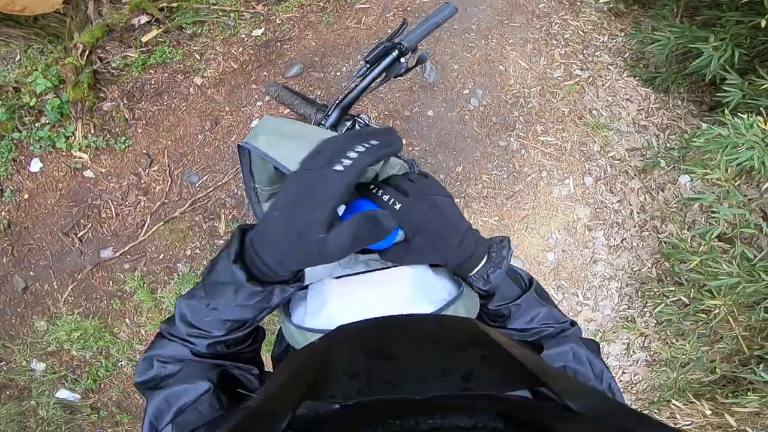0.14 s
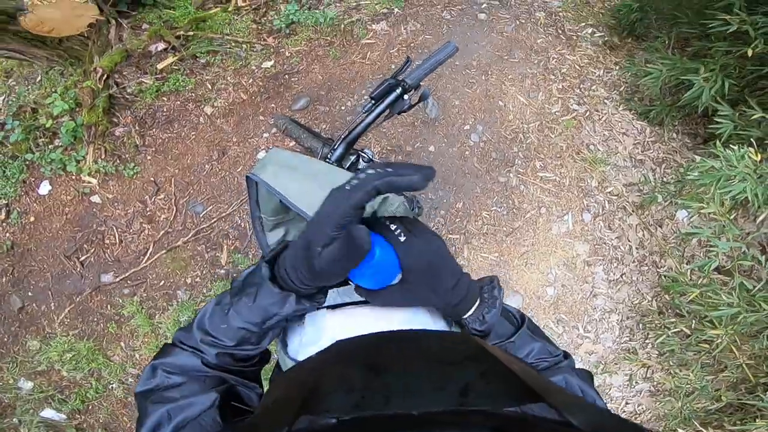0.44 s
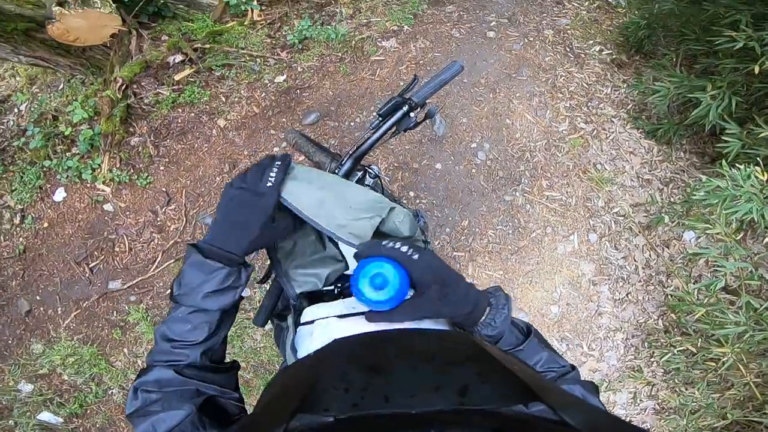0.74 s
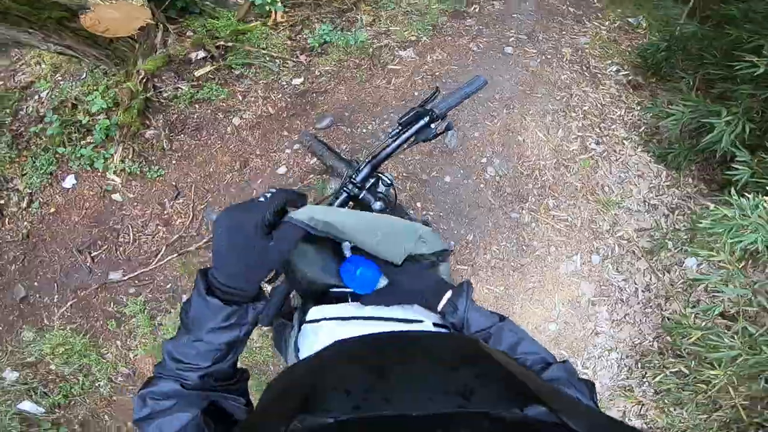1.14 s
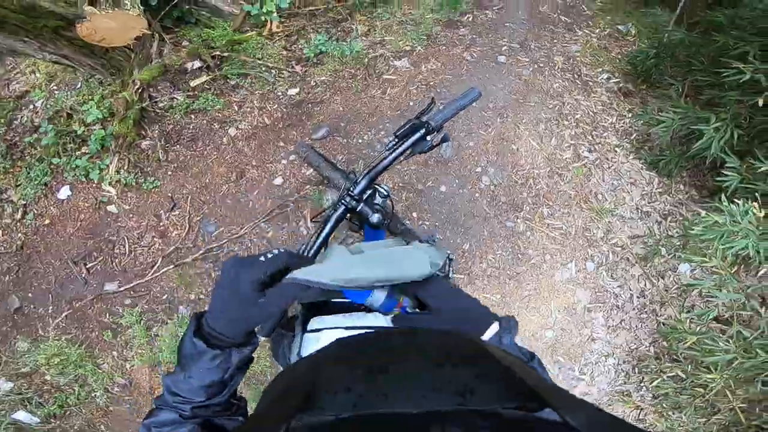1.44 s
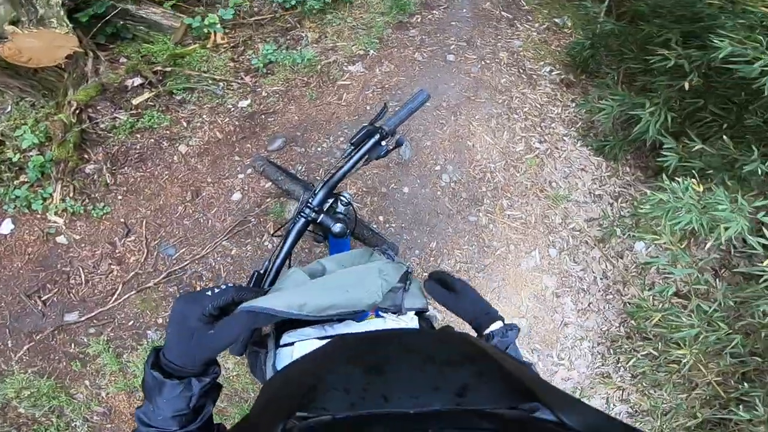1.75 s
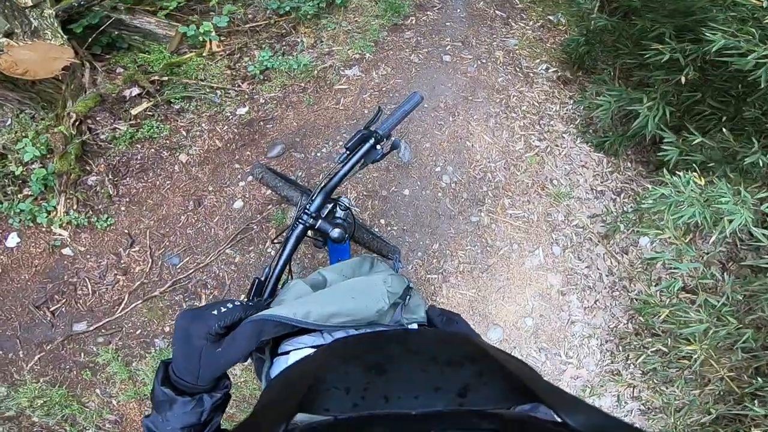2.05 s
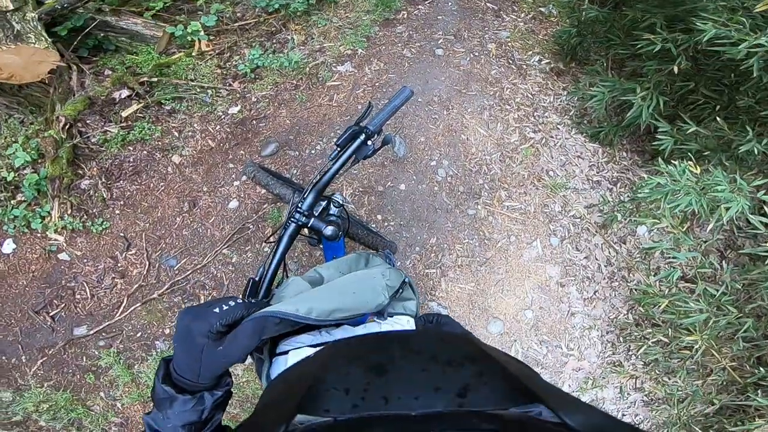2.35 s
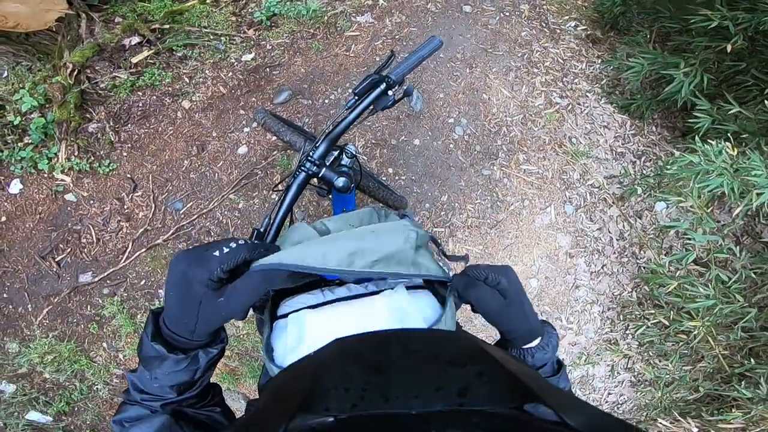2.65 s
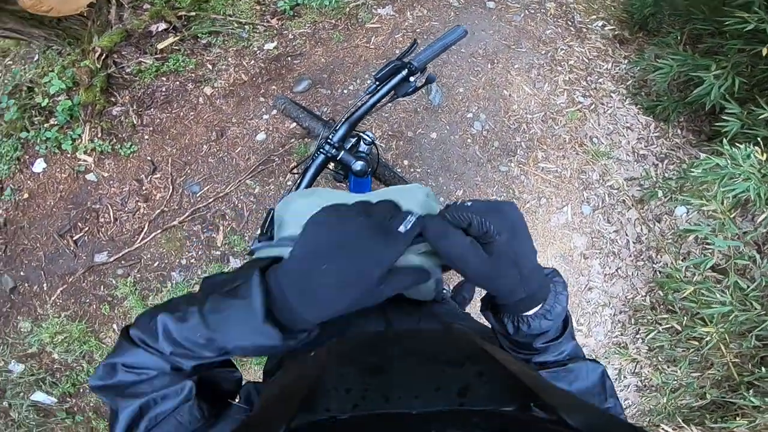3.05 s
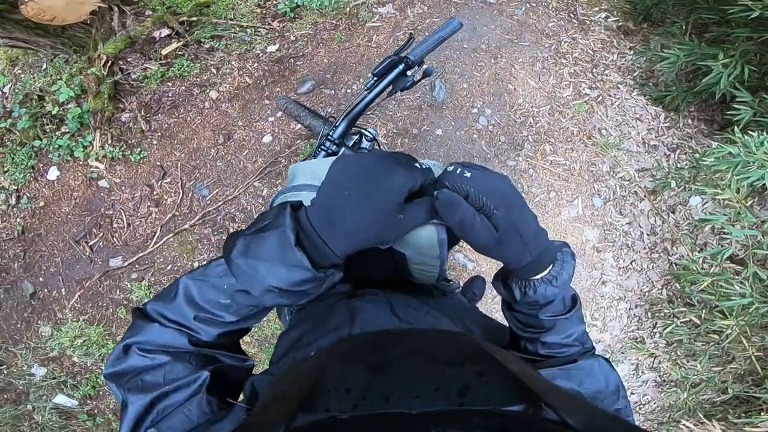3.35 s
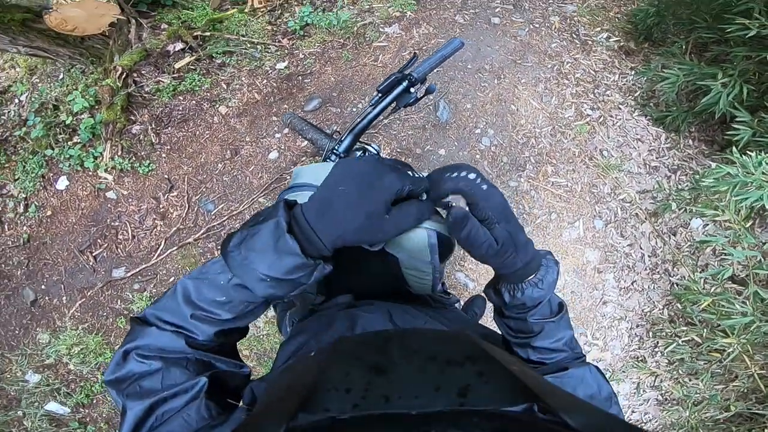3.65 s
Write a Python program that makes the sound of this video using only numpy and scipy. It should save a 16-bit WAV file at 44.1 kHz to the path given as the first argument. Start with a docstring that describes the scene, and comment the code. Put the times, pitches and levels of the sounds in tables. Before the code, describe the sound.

A waist bag zipper closes in one fast rising-then-falling zip, after nylon sleeves rustle and a bottle scrapes into the bag; dull knocks follow, with faint birds, on a quiet forest path, microphone worn on the chest.

```python
"""A quiet forest hiss and rustling nylon sleeves come first, both made of shaped noise, over low bumps.
A rider with a chest camera packs a bottle into a waist bag on a forest path and zips it shut.
Bumps (deep swings) and knocks (dying tones) reach the right microphone through the harness; small clicks
tick. The bottle scrapes in as grainy noise; after a short high squeak, far birds whistle, all as wavering
tones. The zip sounds tooth by tooth: a click, a hum at the tooth rate and a pulsing hiss."""
import sys
import numpy as np
from scipy import signal
from scipy.fft import rfft, irfft, next_fast_len
from scipy.io import wavfile
from scipy.ndimage import map_coordinates

SR = 44100
rng = np.random.default_rng(int(sys.argv[2]) if len(sys.argv) > 2 else 0)


def volts_from_db(level):
    """Convert decibel levels to linear amplitude ratios."""
    exponent = np.asarray(level, float) / 20
    return 10 ** exponent


def log_audio(samples):
    """Write samples as a 16-bit WAV file to the path given in sys.argv[1]."""
    # one column per channel
    frames = np.atleast_2d(samples).T
    # limit to full scale, then quantise
    limited = np.clip(frames, -1, 1)
    pcm = np.round(limited * 32767).astype(np.int16)
    wavfile.write(sys.argv[1], SR, pcm)


N = 167580
T = np.arange(N) / SR  # time of each sample, s

# How hard the sleeves move: start_s, swish_db, crinkle_db (the sleeves add 2.5 dB to the crinkle)
CLOTH_MOVES = [(0, -64.5, -65), (.1, -63.5, -68), (.18, -78, -81), (.26, -73.5, -67.5), (.33, -69, -62),
               (.65, -69.5, -70.5), (.76, -74, -66.5), (1.15, -68.5, -70), (1.28, -72, -69.5),
               (1.39, -60, -63), (1.53, -65, -61.5), (1.65, -72.5, -70), (1.8, -81, -80.5),
               (1.92, -67.5, -66.5), (2.1, -70, -71), (2.25, -74, -74.5), (2.4, -76, -71.5),
               (2.52, -75, -66.5), (2.92, -74, -64.5), (3.02, -67.5, -69), (3.17, -62, -56),
               (3.28, -70.5, -69), (3.5, -71.5, -67), (3.7, -75, -72.5), (3.8, -67.5, -77.5)]


def unit(x):
    """Scale a sound to an rms of 1."""
    return x / np.sqrt(np.mean(x ** 2) + 1e-20)


def along(points, hz):
    """Read a curve of (pitch_hz, value) points on a log pitch axis."""
    point_hz, value = np.transpose(points)
    return np.interp(np.log(hz + 1), np.log(point_hz + 1), value)


def curves(rows):
    """Draw each column after the time as a line with one value per sample."""
    s, *columns = np.transpose(rows)
    return [np.interp(T, s, column) for column in columns]


def wobble(rate_hz):
    """A smooth random curve through rate_hz random points a second."""
    points = rng.standard_normal(int(N * rate_hz / SR) + 4)
    return map_coordinates(points, [T * rate_hz])


def filtered(x, response):
    """Multiply the spectrum of x by a response, a function of pitch in Hz."""
    size = next_fast_len(N + 8192)
    hz = np.fft.rfftfreq(size, 1 / SR)
    return irfft(rfft(x, size) * response(hz), size)[..., :N]


def ports(x, other):
    """Airborne sound reaches both microphone ports; other is the part that differs between them."""
    # left port over right: pitch_hz, level_db
    left_over_right = [(100, 0.5), (400, -2.5), (700, -3.5), (1300, -0.5), (2400, 0), (4400, -3.5),
                       (8000, 0.5), (15000, -2)]
    # how far the left port leads in phase: pitch_hz, lead_rad
    left_lead = [(100, 1.2), (400, 0.8), (750, 2.13), (1300, 1.5), (2500, 0.88), (4000, 0.46), (7500, 0.36),
                 (12000, 9)]
    # how alike the ports sound: pitch_hz, likeness (0 to 1)
    likeness = [(200, 0.52), (700, 1), (3000, 0.78), (6000, 0.38), (9000, 0.07)]
    opposite = np.array([[1], [-1]])  # left, right

    def mix_angle(hz):
        return np.arccos(np.clip(along(likeness, hz), 0, 1)) / 2

    def tilt(hz):
        log_level = along(left_over_right, hz) * np.log(10) / 20
        return np.exp(opposite * (log_level + 1j * along(left_lead, hz)) / 2)

    shared = filtered(x, lambda hz: np.cos(mix_angle(hz)) * tilt(hz))
    different = filtered(other, lambda hz: opposite * np.sin(mix_angle(hz)) * tilt(hz))
    return shared + different


def rustle(spectrum, grains_hz, spread_db, flutter_db):
    """Two rows of noise with random short grains and a fluttering level, coloured, rms 1."""
    grain_size = volts_from_db(spread_db * np.minimum(rng.exponential(size=N), 4))
    grains = (rng.random(N) < grains_hz / SR) * grain_size
    fade = np.exp(-1 / (0.00062 * SR))  # each grain dies away over about 0.6 ms
    burst = 1 + signal.lfilter([1], [1, -fade], grains)
    flutter = volts_from_db(flutter_db * (wobble(12) + wobble(45)))
    noise = rng.standard_normal((2, N)) * burst * flutter
    return unit(filtered(noise, lambda hz: volts_from_db(along(spectrum, hz))))


def inside(start_s, end_s, fade_s):
    """1 between two times, fading to 0 at both ends."""
    return np.clip(np.minimum(T - start_s, end_s - T) / fade_s, 0, 1)


def resonances(rows):
    """Response of resonances side by side (pitch_hz, width_hz, level_db), every second one flipped."""
    def response(f):
        total = 0
        for j, (hz, width_hz, db) in enumerate(rows):
            damping = 1j * f * width_hz
            total = total + (-1) ** j * volts_from_db(db) * damping / (hz * hz - f * f + damping)
        return total
    return response


def forest():
    """The quiet forest is steady coloured noise with a gentle flutter."""
    # colour of the air: pitch_hz, level_db per Hz
    forest_colour = [(70, -8.5), (190, -4), (500, -15.5), (800, -6.5), (1500, -19), (3200, -21),
                     (7000, -30.5), (8500, -34), (15500, -42.5)]
    air = rustle(forest_colour, 0, spread_db=0, flutter_db=2.5) * volts_from_db(-63)
    return ports(*air)


def sleeves():
    """Nylon sleeves swish high and crinkle lower, both as grainy noise in the air."""
    # colour of the swish: pitch_hz, level_db per Hz
    swish_colour = [(2000, -51), (3500, -3), (4500, -4), (6500, 1), (7600, -4.5), (8400, -15.5),
                    (13000, -24.5), (15500, -45)]
    # colour of the crinkle: pitch_hz, level_db per Hz
    crinkle_colour = [(300, -16), (500, -0.5), (2200, -3), (3200, -5.5), (5000, -23.5), (8000, -72)]
    swish_db, crinkle_db = curves(CLOTH_MOVES)
    swish = rustle(swish_colour, 110, spread_db=-1.0, flutter_db=0.36) * volts_from_db(swish_db)
    crinkle = rustle(crinkle_colour, 150, spread_db=1.0, flutter_db=0.8) * volts_from_db(crinkle_db + 2.5)
    return ports(*(swish + crinkle))


def harness_creak():
    """The harness creaks as low grainy noise, stronger on the right, following the sleeves' crinkle."""
    # colour of the creak: pitch_hz, level_db per Hz
    creak_colour = [(80, -16.5), (185, 3), (260, -5), (400, -7), (700, -26.5), (1500, -71)]
    crinkle_db = curves(CLOTH_MOVES)[1]
    level_db = -57.5 + 0.58 * (crinkle_db - crinkle_db.mean())
    creak = rustle(creak_colour, 40, spread_db=1.0, flutter_db=3.0) * volts_from_db(level_db)
    return creak * volts_from_db([[-3], [4]])  # left, right


def bumps():
    """The camera lurches on the chest: a few deep swings each, over a restless sway, mostly on the right."""
    # lurches: middle_s, length_s, peak_db, pitch_hz
    lurches = [(0.031, 0.082, -40.5, 30), (0.357, 0.057, -25, 23.6), (0.457, 0.077, -39.5, 49),
               (0.762, 0.085, -31.5, 37), (0.827, 0.038, -36, 64.6), (1.217, 0.056, -26.5, 34.9),
               (1.478, 0.034, -32.5, 47.3), (1.653, 0.057, -34.5, 36.4), (1.745, 0.042, -40, 45.3),
               (1.994, 0.084, -40, 37.7), (2.128, 0.095, -32.5, 37.3), (2.401, 0.047, -33, 58),
               (2.514, 0.09, -24, 36), (2.787, 0.048, -23.5, 50.6), (2.981, 0.071, -33, 34),
               (3.026, 0.029, -30.5, 57.8), (3.212, 0.074, -31, 27.7), (3.318, 0.075, -20, 45),
               (3.368, 0.052, -20, 39.5), (3.482, 0.036, -29, 41.2), (3.71, 0.039, -38.5, 44)]
    # colour of the sway: pitch_hz, level_db per Hz
    sway_colour = [(15, -24), (30, 11.5), (55, 4.5), (75, -6.5), (200, -78)]
    noise = rng.standard_normal((2, N))
    sway = unit(filtered(noise, lambda hz: volts_from_db(along(sway_colour, hz))))
    sway = sway * volts_from_db(-53.5 + 3.1 * wobble(6.8))
    right = sway[1]
    for s, length_s, db, hz in lurches:
        swell = np.exp(-8 * ((T - s) / length_s) ** 2)
        right = right + volts_from_db(db) * swell * np.cos(2 * np.pi * hz * (T - s))
    left = volts_from_db(-20) * right + volts_from_db(-12.0) * sway[0]
    return np.array([left, right])


def knocks():
    """A rough, rattling contact rings the camera mount and the strap under it, loud in the right port."""
    # knocks on the harness: start_s, low_mode_db, strap_db, strap_hz, upper_modes_db
    hits = [(0.263, -37, -27, 380, -38), (0.285, -41, -19.5, 268, -26.5), (0.322, -38, -22, 386, -36),
            (0.43, -37, -35, 304, -42), (1.201, -29.5, -36, 368, -41), (1.707, -35, -26.5, 320, -36.5),
            (1.927, -57, -33, 420, -38), (2.388, -20, -24, 295, -17.5), (2.482, -30.5, -35, 370, -42.5),
            (2.765, -26, -8.5, 469.6, -21), (3.01, -34, -38, 300, -52), (3.078, -31, -22, 370, -35.5),
            (3.1345, -32, -9, 368, -22), (3.277, -33.5, -31, 354, -42), (3.346, -34, -27.5, 374, -33.5),
            (3.445, -31.5, -17.5, 370, -26)]
    # mount modes, the low one first: pitch_hz, level_db (added to the knock's), t60_s (time to fall 60 dB)
    mount = [(189, 3.5, 0.14), (630, -2, 0.02), (756, -2.5, 0.026), (1180, -6.5, 0.012),
             (1600, -14.5, 0.017)]
    strap_t60_s, contact_t60_s, contact_rise_s = 0.061, 0.042, 0.00086
    out = np.zeros(N + SR)
    t = np.arange(SR // 5) / SR
    contact_t = t[:SR // 30]
    contact = volts_from_db(-60 * contact_t / contact_t60_s) * (1 - np.exp(-contact_t / contact_rise_s))
    push = contact ** 12  # the short, smooth core of the contact
    push = push / push.sum()
    for s, low_db, strap_db, strap_hz, upper_db in hits:
        modes = []
        for hz, db, t60_s in mount:
            mode_db = db + 2 * rng.standard_normal()
            modes.append(volts_from_db(mode_db - 60 * t / t60_s) * np.sin(2 * np.pi * hz * t))
        strap = volts_from_db(strap_db - 60 * t / strap_t60_s) * np.sin(2 * np.pi * strap_hz * t)
        rattle = contact * rng.standard_normal(len(contact))
        rattle = rattle / np.linalg.norm(rattle)
        low = signal.fftconvolve(volts_from_db(low_db) * modes[0] + strap, push)
        upper = volts_from_db(upper_db) * signal.fftconvolve(sum(modes[1:]), rattle)
        out[round(s * SR):][:len(t)] += (low + upper)[:len(t)]
    # the right port loses only the deepest part, the left keeps the brighter part, flipped
    right = filtered(out[:N], lambda f: 1j * f / (115 + 1j * f))
    bright = filtered(out[:N], lambda f: 1j * f / (600 + 1j * f))
    return np.array([-volts_from_db(-4) * bright, right])


def ticks():
    """Small clicks in the air, among them ticks of the scraping bottle and cracks of the knocks.

    Each is a tiny noise burst through a broad resonance at the click's pitch."""
    # clicks: start_s, peak_db (before the ports), pitch_hz
    clicks = [(0.2851, -33.5, 4460), (0.2836, -37.5, 1030), (0.717, -52, 3140), (0.7981, -48, 1300),
              (0.821, -47, 1850), (0.9647, -27, 2600), (0.9714, -24, 1760), (1.001, -32, 3100),
              (1.072, -44, 1190), (1.0616, -34.5, 1050), (1.3827, -40, 2160), (1.6306, -47.5, 3160),
              (1.8918, -49, 1420), (1.921, -45.5, 1470), (2.0538, -44, 1480), (2.5427, -47, 1180),
              (2.774, -29, 1180), (2.9412, -44.5, 1310), (3.1328, -28, 1600), (3.468, -42, 1100)]
    t60_s, relative_width, wide_db, port_hz = 0.021, 0.32, -28, 7600
    out = np.zeros(N + SR)
    t = np.arange(1024) / SR
    f = np.fft.rfftfreq(len(t), 1 / SR)
    fade_out = np.hanning(2 * len(t))[len(t):]
    for s, db, hz in clicks:
        burst = rng.standard_normal(len(t)) * volts_from_db(-60 * t / t60_s)
        peak = resonances([(hz, relative_width * hz, 0)])(f)
        colour = (peak + volts_from_db(wide_db)) / (1 + (f / port_hz) ** 12) * (f > 500)
        ring = irfft(rfft(burst) * colour) * fade_out
        out[round(s * SR):][:len(t)] += volts_from_db(db) * ring / np.abs(ring).max()
    return ports(out[:N], np.zeros(N))


def scrape():
    """The bottle scrapes into the bag: coarse slips of plastic over nylon, as grainy noise."""
    # scraping: start_s, low_db (6 dB is added below), treble_db
    strokes = [(.79, -65, -77), (.85, -54.5, -64.5), (.9, -55.5, -56.5), (.95, -53.5, -48.5),
               (.968, -42.5, -42.5), (1.01, -39, -47.5), (1.035, -49.5, -54.5), (1.07, -59, -67),
               (1.1, -51, -82)]
    # colour of the low part: pitch_hz, level_db per Hz
    low_colour = [(71, -36), (120, -1), (1370, -13.5), (4000, -24), (5200, -35), (8800, -120)]
    # colour of the treble: pitch_hz, level_db per Hz
    treble_colour = [(2060, -21), (3500, -8.5), (7150, 0.5), (8560, -12), (12100, -17), (15400, -21)]
    slip_db = 3.3  # size spread of the coarse slips
    low_db, treble_db = curves(strokes)
    low = rustle(low_colour, 300, spread_db=slip_db, flutter_db=1.0) * volts_from_db(low_db + 6.0)
    treble = rustle(treble_colour, 350, spread_db=slip_db, flutter_db=1.0) * volts_from_db(treble_db)
    on = inside(strokes[0][0], strokes[-1][0], 0.02)
    return ports(*((low + treble) * on))


def squeak_and_birds():
    """Far birds whistle level tones, after one short high squeak: sines unsteady in pitch and strength."""
    # the squeak, then the whistles: start_s, length_s, level_db (before the ports), pitch_hz
    tones = [(1.105, .035, -60, 7520), (3.255, .145, -65, 3520), (3.325, .12, -66, 3290),
             (3.555, .125, -66, 3040), (3.67, .068, -68, 2525)]
    x = np.zeros(N)
    for s, length_s, db, hz in tones:
        progress = np.clip((T - s) / length_s, 0, 1)
        swell = np.sin(np.pi * progress) ** 0.5
        phase = 2 * np.pi * np.cumsum(hz + 45 * wobble(120)) / SR
        x = x + volts_from_db(db + 2.7 * wobble(60)) * swell * np.sin(phase)
    return ports(x, np.zeros(N))


def tooth_clicks(teeth):
    """One click per passing tooth, slightly off in time and size, placed between samples."""
    timing_jitter, size_db = 0.022, 3  # share of a tooth period, size scatter
    number = np.arange(1, int(teeth[-1]))
    draw = rng.standard_normal((len(number), 2))
    at = np.interp(number + timing_jitter * draw[:, 0], teeth, np.arange(N))
    i = np.clip(at.astype(int), 0, N - 2)
    size = volts_from_db(size_db * draw[:, 1])
    return np.bincount(i, size * (1 - at + i), N) + np.bincount(i + 1, size * (at - i), N)


def zipper():
    """The tape hums at the tooth rate and its octave; each tooth rings the slider and gates a hiss."""
    # slider: start_s, teeth_hz (teeth per second), hum_db, click_db, hiss_db (7 dB is added to hum and hiss)
    slider = [(2.556, 250, -62, -60, -68), (2.582, 360, -41, -50, -64), (2.6, 442, -39.5, -47.5, -59),
              (2.626, 630, -52, -51.5, -50.5), (2.642, 736.5, -45, -41, -54.5),
              (2.66, 823, -44.5, -48.5, -48), (2.678, 896.7, -41.5, -49, -51.5),
              (2.696, 836.3, -41, -45, -48.5), (2.712, 744, -58, -51.5, -51), (2.724, 659.6, -40, -48, -57),
              (2.762, 593.2, -45, -49, -55), (2.778, 438.7, -41, -47.5, -59.5),
              (2.8, 289.7, -42.5, -50, -62), (2.825, 200.8, -50.5, -50, -55.5), (2.86, 145, -54, -63, -60)]
    # slider body resonances: pitch_hz, width_hz, level_db
    slider_body = [(1310, 490, 5.5), (1910, 500, 3), (2600, 500, -3), (3370, 640, -2), (5800, 2500, -6)]
    # colour of the hiss: pitch_hz, level_db per Hz
    hiss_colour = [(200, -4.5), (500, 2), (1500, -4.5), (2600, -10.5), (4000, -15), (7100, -11.5),
                   (8500, -25.5), (15500, -35)]
    snag_s, fade_s, full_speed_hz = 2.775, 0.012, 800
    rate_hz, hum_db, click_db, hiss_db = curves(slider)
    # an unsteady hand; past the snag the teeth catch unevenly
    unsteady = 1 + 0.017 * wobble(110) + 0.22 * (T > snag_s) * wobble(250)
    teeth = np.cumsum(rate_hz * unsteady) / SR  # teeth passed so far
    clicks = tooth_clicks(teeth)
    on = inside(slider[0][0], slider[-1][0], fade_s)
    strike = (rate_hz / full_speed_hz) ** 2  # slower teeth strike duller

    ring = filtered(clicks * on, resonances(slider_body[:-1]))
    ring = ring - filtered(clicks * on * strike, resonances(slider_body[-1:]))
    ring = ring / np.sqrt(np.mean(ring[on > 0] ** 2)) * volts_from_db(click_db)

    # the slowing slider rasps on one mode
    held = inside(2.72, 2.788, fade_s)
    rasp = filtered(clicks * held, resonances([(2480, 260, 0)]))
    rasp = rasp / np.sqrt(np.mean(rasp[held > 0] ** 2)) * volts_from_db(-46)

    hum = np.sin(2 * np.pi * teeth) * volts_from_db(hum_db + 7.0 + 3.2 * wobble(200))
    octave = np.sin(4 * np.pi * teeth) * volts_from_db(click_db + 4 + 4.4 * wobble(150)) * strike
    gate = 1 + 0.88 * np.cos(2 * np.pi * teeth)
    hiss = rustle(hiss_colour, 270, spread_db=-5.0, flutter_db=1.76) * gate * volts_from_db(hiss_db + 7) * on
    return ports((hum + octave) * on + ring + rasp + hiss[0], hiss[1])


def scene():
    """Everything over the quiet forest."""
    clothing = sleeves() + harness_creak()
    handling = bumps() + knocks() + ticks() + scrape() + zipper()
    return forest() + clothing + handling + squeak_and_birds()


def band_limit(x):
    """A steep low-pass at the top of the band."""
    return signal.sosfilt(signal.butter(12, 15580, fs=SR, output="sos"), x)


def record(dry):
    """The finished mix as the camera keeps it."""
    return band_limit(dry)


dry = scene()
out = record(dry)
log_audio(out)
```